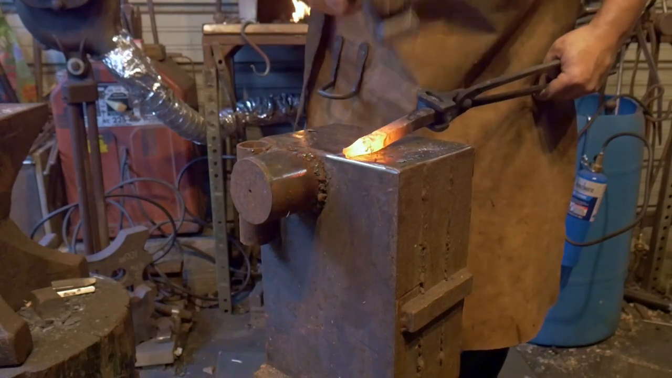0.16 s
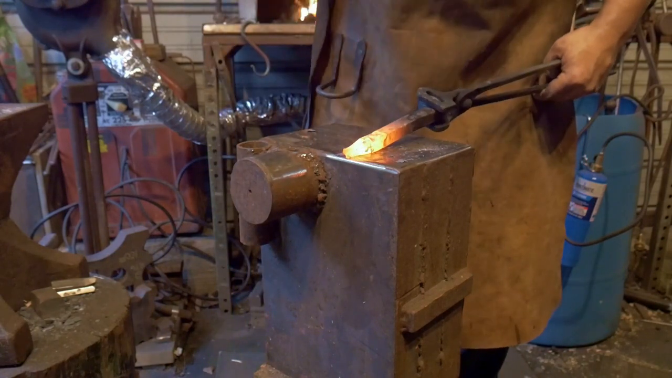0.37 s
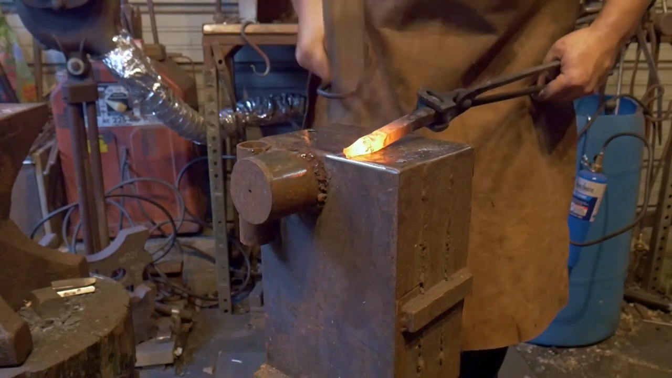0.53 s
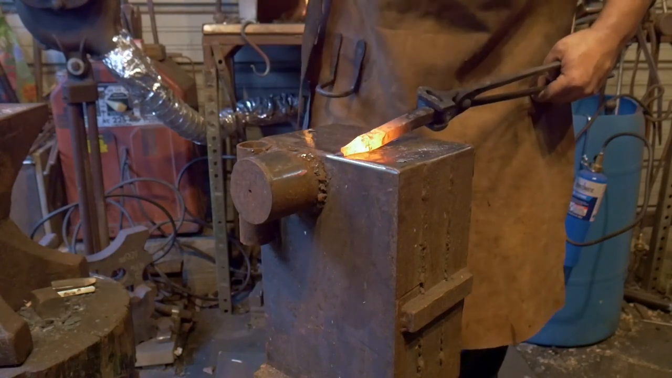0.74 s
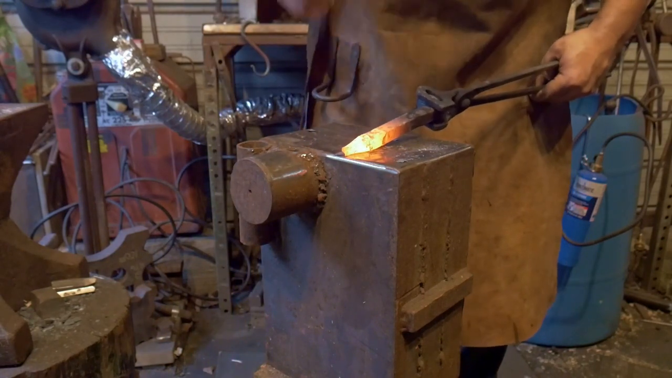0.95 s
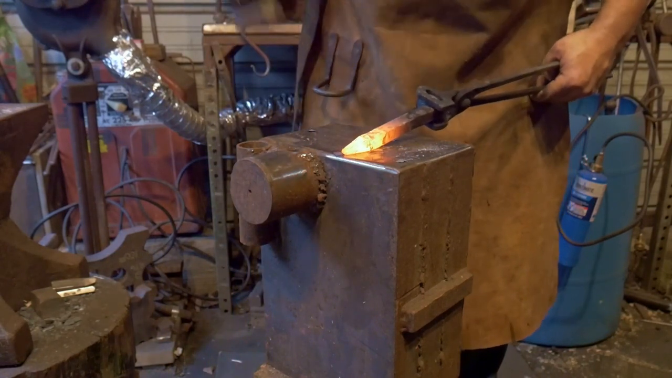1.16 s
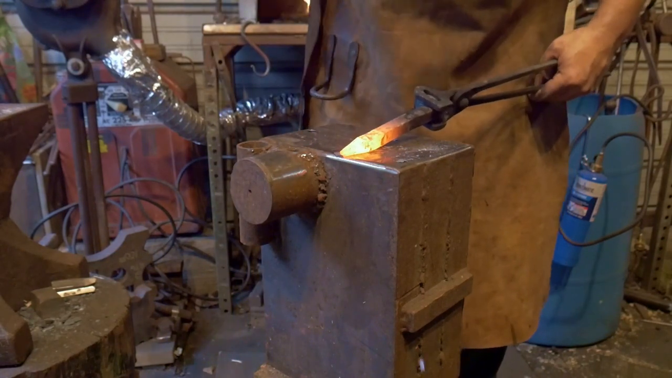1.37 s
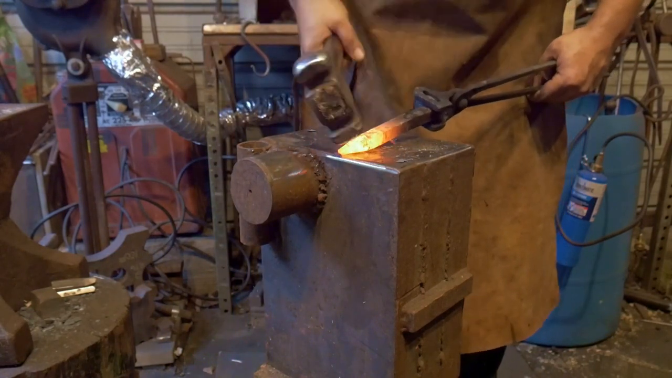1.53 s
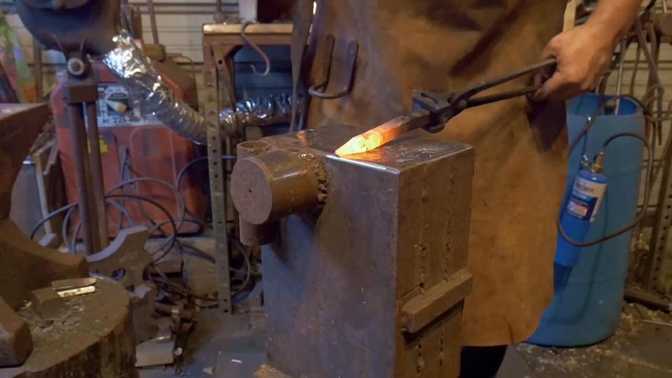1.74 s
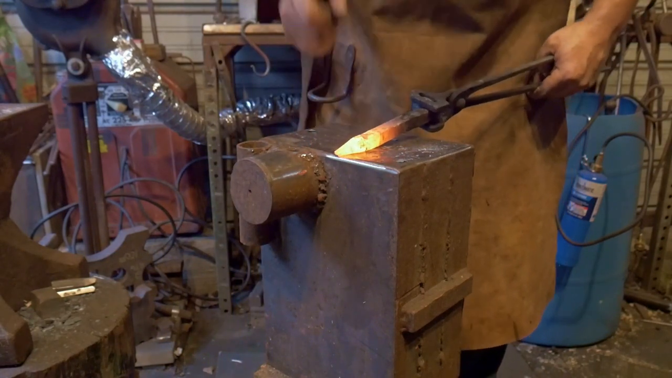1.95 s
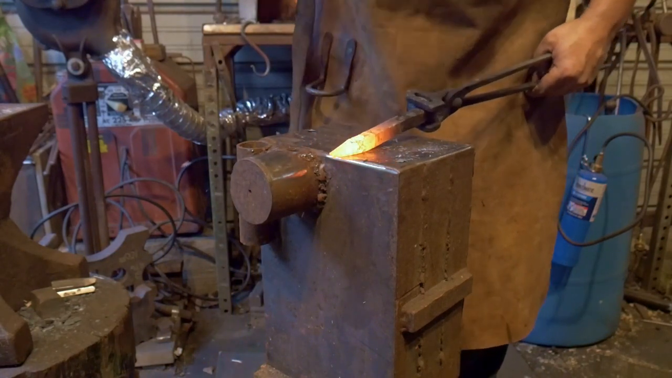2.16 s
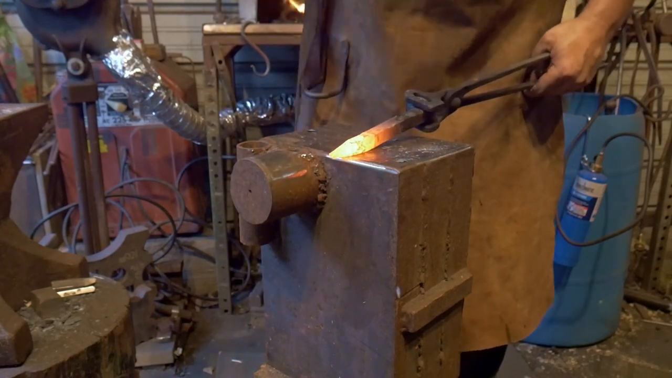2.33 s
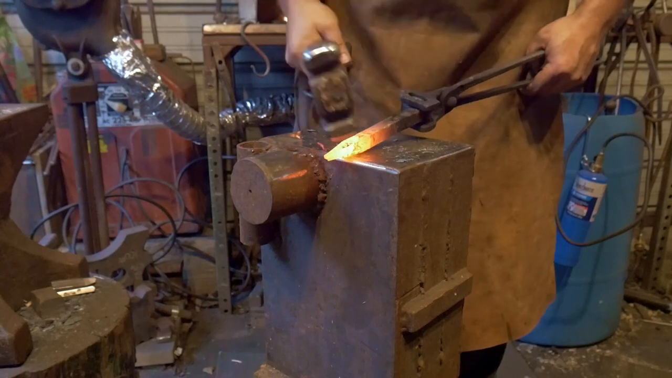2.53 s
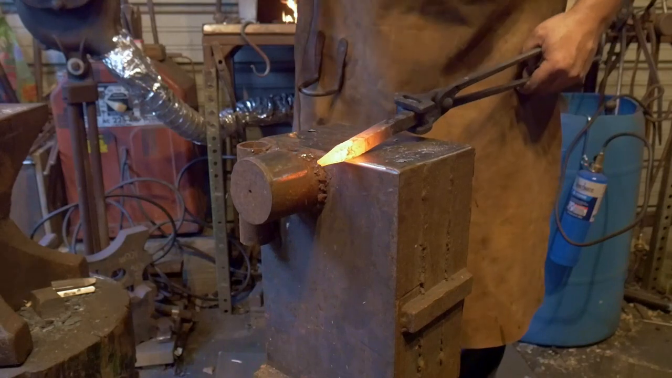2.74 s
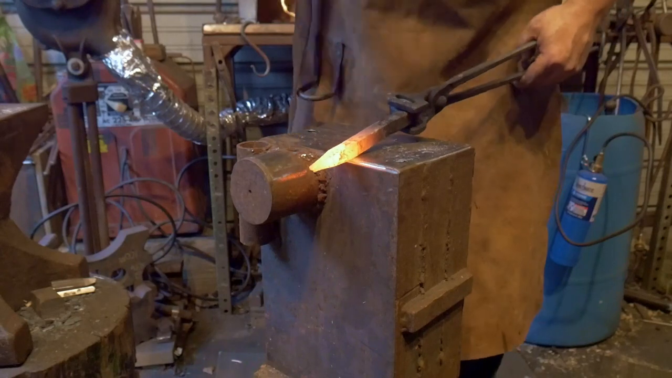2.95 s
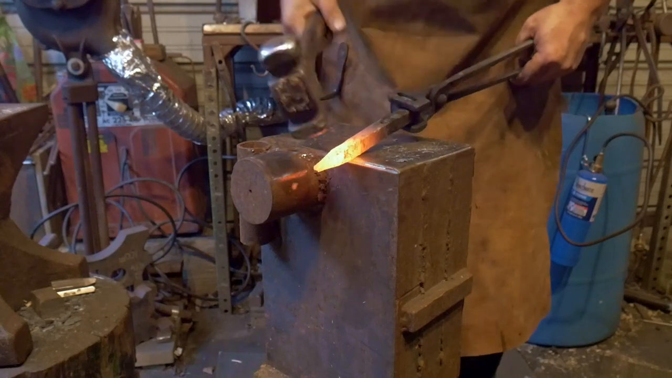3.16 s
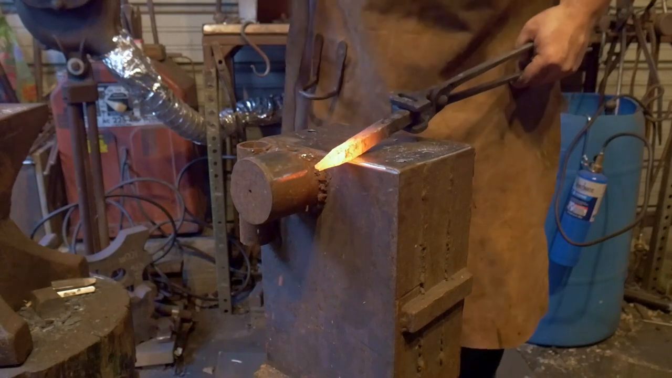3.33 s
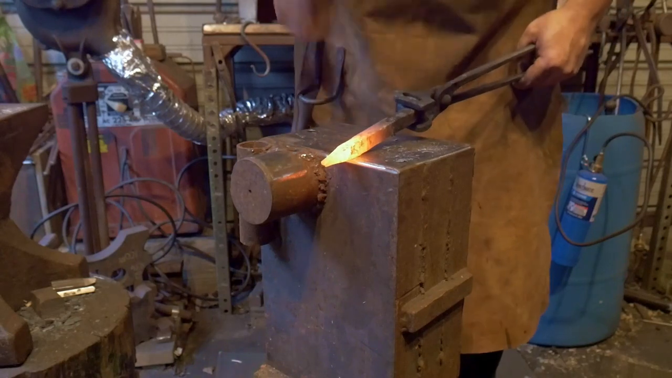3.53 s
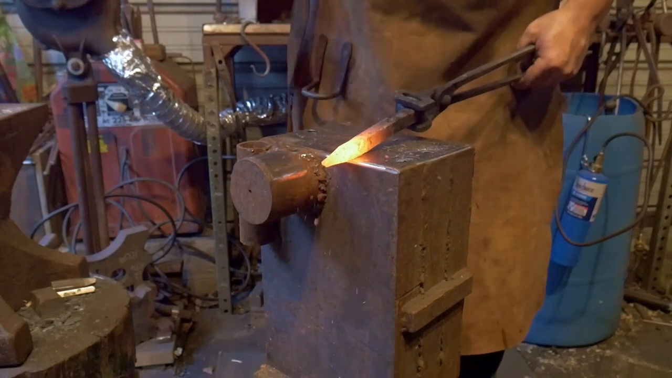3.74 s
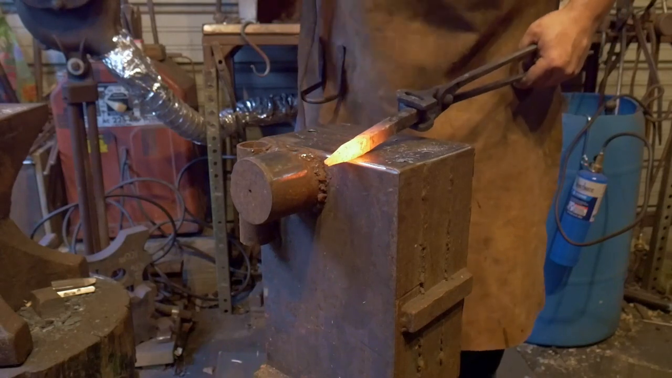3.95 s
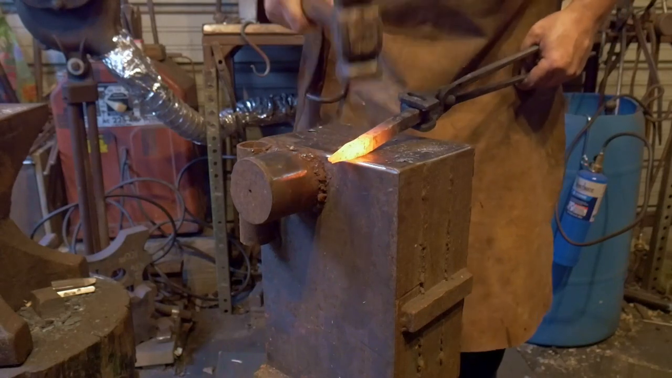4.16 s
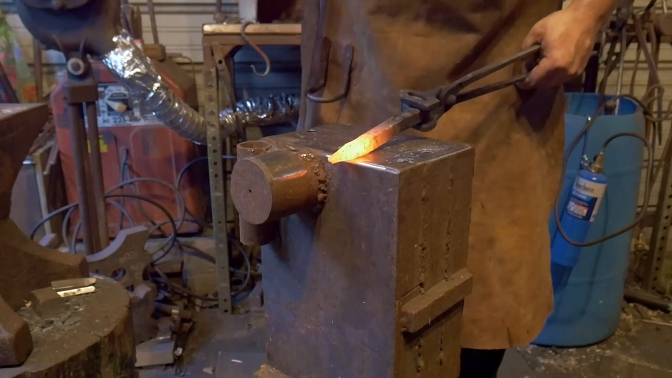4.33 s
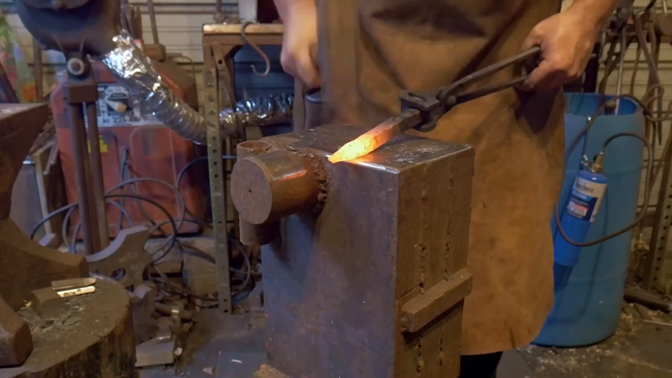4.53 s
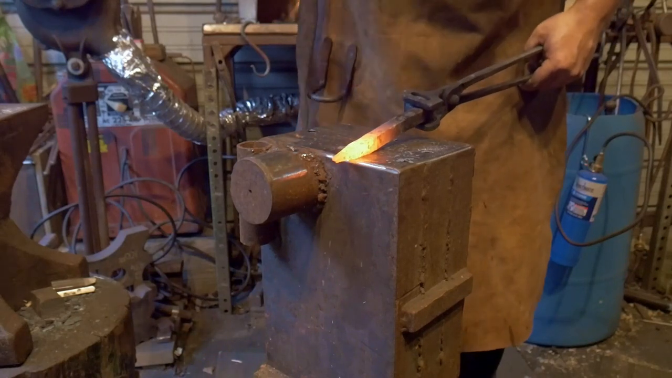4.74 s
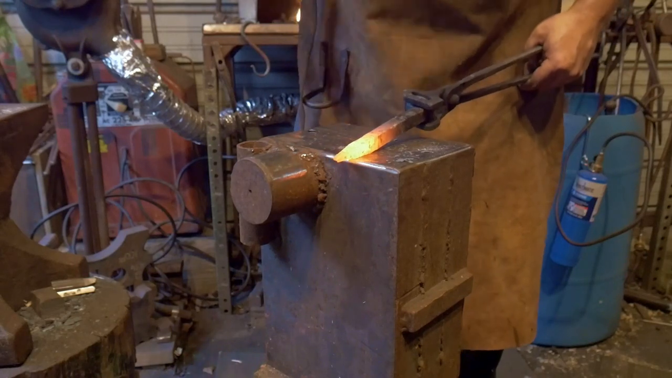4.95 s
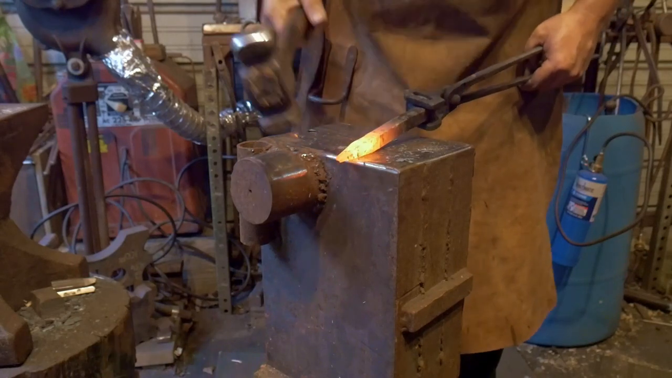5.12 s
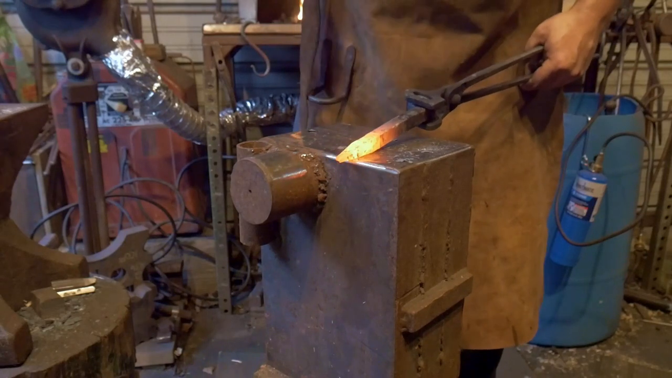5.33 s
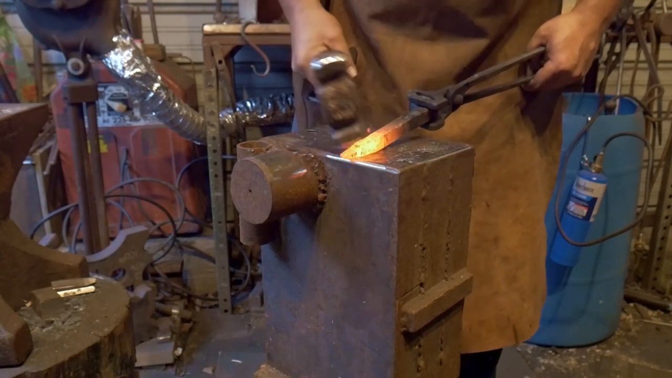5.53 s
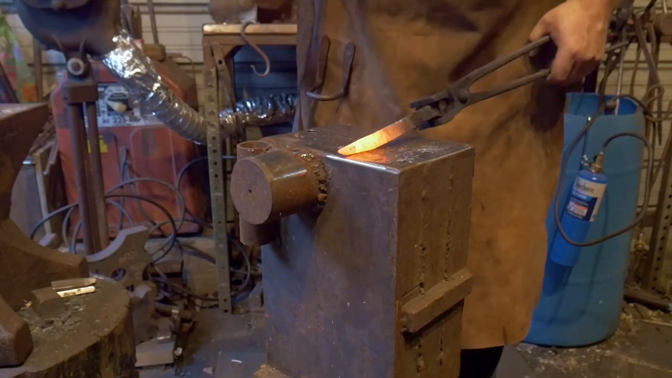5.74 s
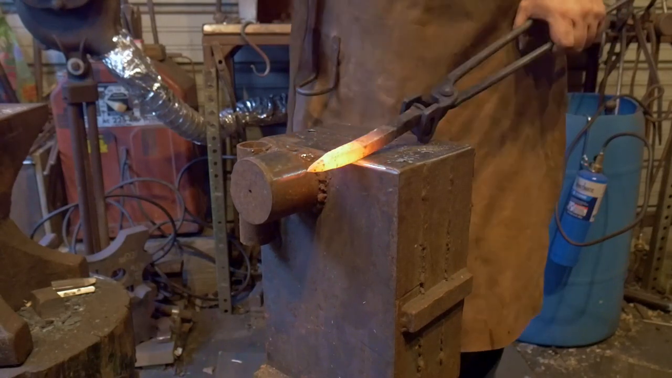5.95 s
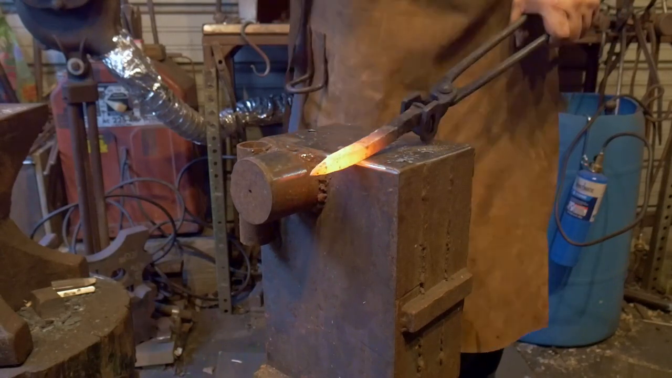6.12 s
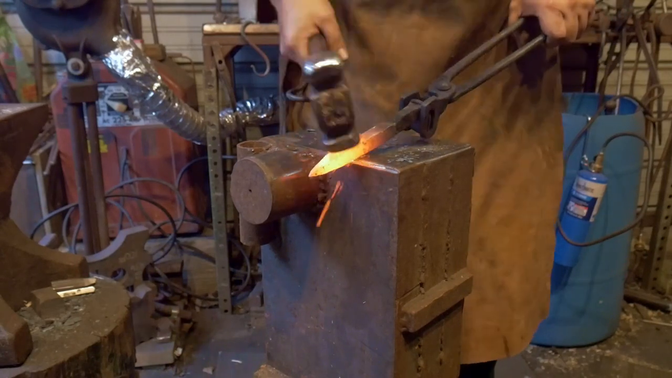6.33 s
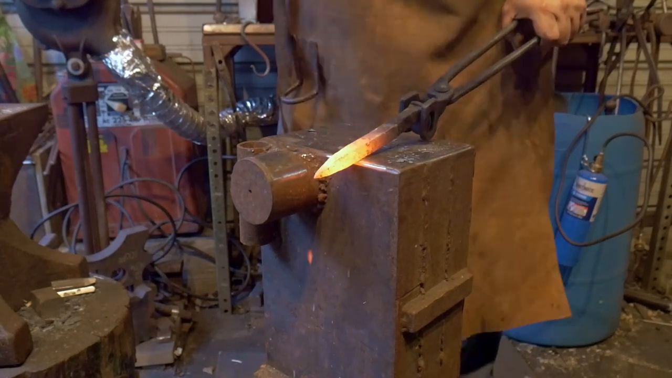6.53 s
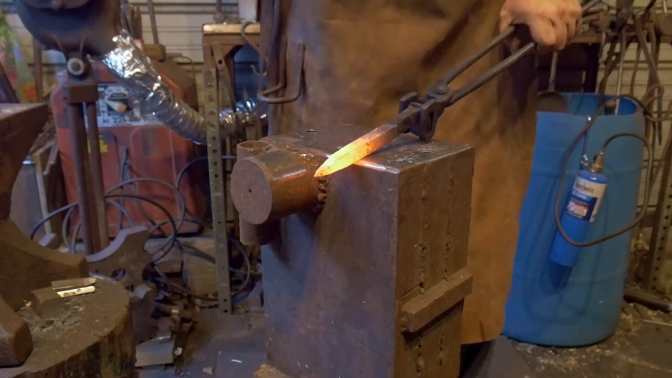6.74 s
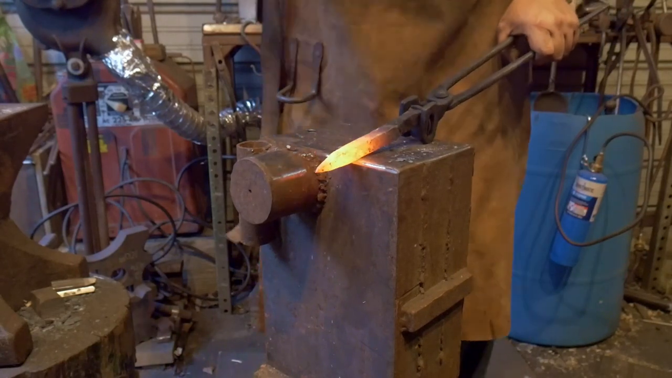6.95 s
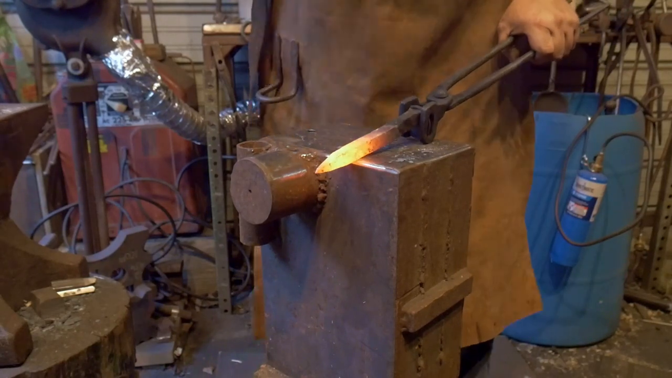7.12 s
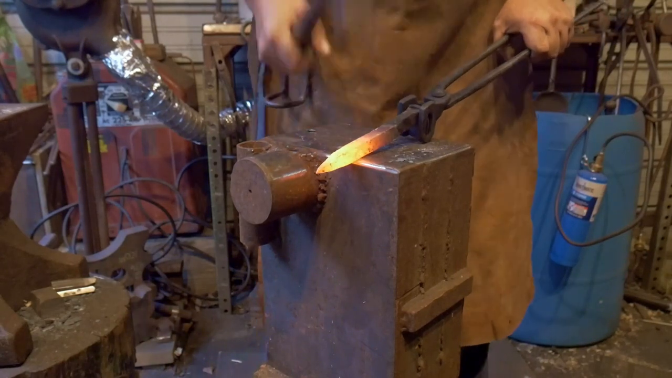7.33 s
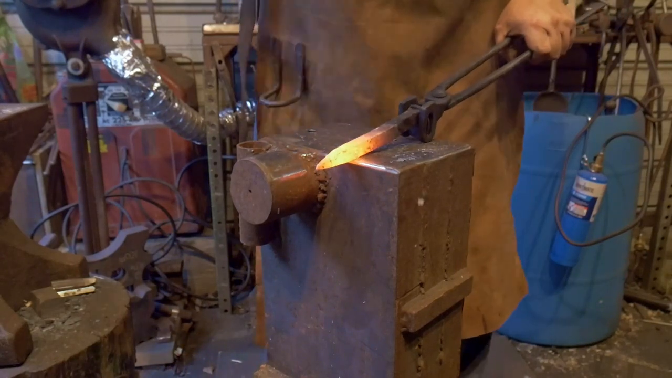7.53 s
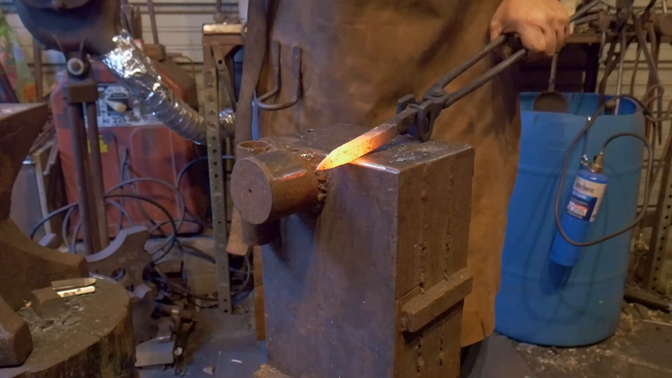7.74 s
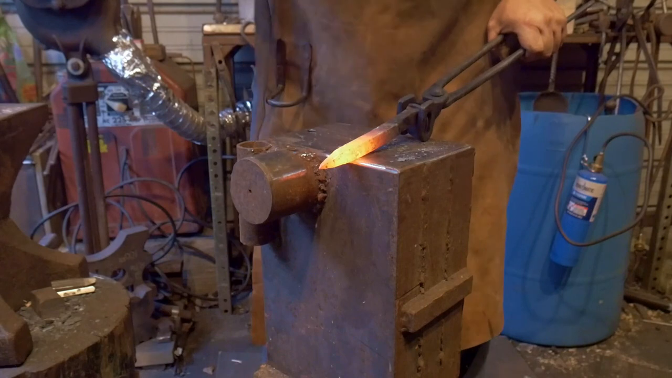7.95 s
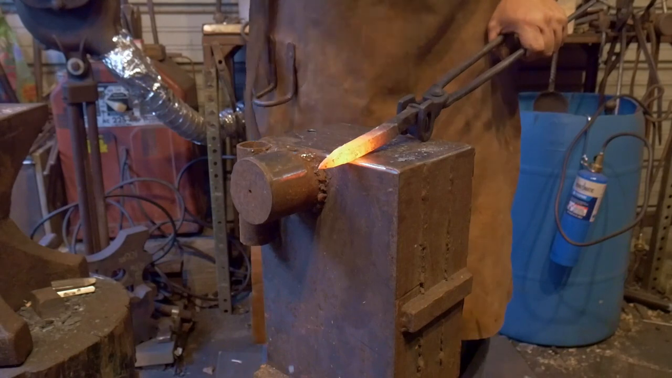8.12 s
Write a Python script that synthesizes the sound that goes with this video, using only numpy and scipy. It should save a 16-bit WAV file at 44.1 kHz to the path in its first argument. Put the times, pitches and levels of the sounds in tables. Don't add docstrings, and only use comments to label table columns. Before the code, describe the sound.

A hand hammer strikes hot steel on a block anvil in steady blows, dull thud and bright crack with a short metallic ring, workshop echoing.

```python
import sys
import numpy as np
from scipy import signal
from scipy.fft import rfft, irfft
from scipy.io import wavfile
from scipy.ndimage import uniform_filter1d

SR = 44100
rng = np.random.default_rng(int(sys.argv[2]) if len(sys.argv) > 2 else 0)


def makeup_ratio(level_db):
    decades = np.asarray(level_db, float) / 20
    return 10 ** decades


def generate_wav(sig):
    pcm = np.round(np.clip(np.atleast_2d(sig).T, -1, 1) * 32767).astype(np.int16)
    wavfile.write(sys.argv[1], SR, pcm)


N = 360738

# start_s, thud_db, knock_db, crack_db, edge_db
BLOWS = [(0.1323, 3.5, -2.5, -3.5, -14.5), (0.6219, 1.5, -0.5, -4.5, -17), (1.0978, -0.5, -5, -4.5, -19),
         (1.5907, 2.5, 1.5, -1, -10), (2.0708, 0.5, 0, -1, -13.5), (2.5913, -1, 1, -2.5, -10.5),
         (3.1647, 1.5, -3, -2.5, -15.5), (3.6663, 2, 0.5, 0, -8.5), (4.1375, -0.5, -1, 1.5, -7.5),
         (4.6224, 0, 0, 0, -10.5), (5.1184, 2.5, -3, -3.5, -12), (5.6091, -1, -0.5, -2, -12),
         (6.3865, -2.5, -5, 1.5, -12), (6.9087, 0.5, -2, 1, -8.5), (7.416, -0.5, -2, 3, -10.5),
         (7.9121, 1, -4.5, 4, -13.5)]
# across_face (-1..1), along_block (-1..1), face_pitch_hz, bar_pitch_hz
LANDINGS = [(0.11, 0.96, 9860, 3000), (-.52, -0.079, 9760, 3035), (-.72, -0.26, 15000, 2955),
            (-0.39, 0.066, 11000, 1900), (0.26, .35, 6030, 2600), (.52, .06, 9700, 1700),
            (-.83, 0.41, 5420, 3540), (.44, -0.23, 9960, 3080), (0.72, 0.64, 9560, 4100),
            (0.46, -.59, 11000, 2600), (-0.34, 0.95, 5960, 3030), (0.42, 0.97, 11000, 4504),
            (.99, 0.73, 7580, 1600), (-.31, 0.3, 9750, 8100), (-0.73, -0.27, 9860, 4300),
            (0.38, -0.29, 14000, 2610)]


def evened(x):
    return x / np.sqrt(np.mean(x ** 2) + 1e-20)


def read(points, hz):
    f, value = np.transpose(points)
    return np.interp(np.log(hz + 1), np.log(f + 1), value)


def coloured(x, points):
    gain = makeup_ratio(read(points, np.fft.rfftfreq(x.shape[-1], 1 / SR)))
    return irfft(rfft(x) * gain, x.shape[-1])


def add(mix, start_s, sound):
    part = mix[..., round(start_s * SR):][..., :sound.shape[-1]]
    part += sound[..., :part.shape[-1]]


def ring(modes, t, spread_db=0, detune=0, phase=0):
    hz, db, t60_s = np.transpose(modes)[..., None]
    chance = rng.standard_normal((3, len(hz), 1))
    turns = hz * (1 + detune * chance[1]) * t + phase * chance[2]
    level = makeup_ratio(db + spread_db * chance[0] - 60 * t / t60_s)
    return (level * np.sin(2 * np.pi * turns)).sum(0)


def forge():
    # hz, db_per_hz
    roar = [(15, -71), (25, -62), (69, -12.5), (221, -8.5), (267, -11.5), (322, -10.5), (666, -9),
            (1050, -12), (1380, -13), (1750, -15.5), (5880, -25.5), (6550, -25.5), (15500, -45.5)]
    # hz, likeness (0..1)
    likeness = [(60, 0.91), (150, 0.79), (380, 0.79), (950, 0.6), (2380, 1), (5980, 0.73), (15000, 0.47)]
    # pitch_hz, level_db, width_hz
    blower = [(165, -66, 14), (1474, -66.5, 8)]
    # time_s, level_db
    flame = [
        (0.0, -56),
        (1.57, -52.5),
        (2.21, -56),
        (4.65, -52.5),
        (4.76, -56.5),
        (6.04, -55.5),
        (6.35, -51),
        (7.36, -54),
        (8.18, -50),
    ]
    roar_db, flame_mean_db = -50.5, -63

    hop = 256
    frames, hz = N // hop + 5, np.fft.rfftfreq(1024, 1 / SR)
    a, b, c, d, patches = rng.standard_normal((frames, 513, 5)).T
    patches = evened(uniform_filter1d(uniform_filter1d(patches, 10, 0), 8, 1))

    flame_db = np.interp(np.arange(frames) * hop / SR, *np.transpose(flame)) - flame_mean_db
    flicker_db = 1.4 * evened(uniform_filter1d(rng.standard_normal(frames), 5))
    lumps_db = (flame_db + flicker_db) / (1 + (hz[:, None] / 600) ** 2)

    same = np.clip(read(likeness, hz), -1, 1)[:, None]
    left = a + 1j * b
    right = same * left + np.sqrt(1 - same ** 2) * (c + 1j * d)
    z = np.array([left, right]) * makeup_ratio(read(roar, hz)[:, None] + patches + lumps_db)
    out = makeup_ratio(roar_db) * evened(signal.istft(z, nperseg=1024, noverlap=768)[1][:, :N])

    for line_hz, db, width_hz in blower:
        pole = np.exp(2j * np.pi * line_hz / SR - np.pi * width_hz / SR)
        line = signal.lfilter([1], [1, -pole], rng.standard_normal(N)).real
        out += makeup_ratio(db) * evened(line)
    return out


def anvil():
    # pitch_hz, level_db, t60_s
    leftover = [(5749, -63, .85)]
    # pitch_hz, level_db, t60_s
    rings = [(2864, -32, .65), (5749, -32, .85), (5808, -25, .38), (7054, -33, .55), (7496, -34, .58),
             (10075, -45, .45), (11445, -50, .4), (11880, -53, .7)]
    # base_db, db_per_knock_db, db_across_face, db_along_block
    waking = [(-2.4, 2, 2, 0), (-10, 0.1, 0.5, 2.2), (-3.5, 1.9, 4, 5), (-4, .6, 8.5, -4),
              (-2.5, -0.4, 2, -11.5), (1.5, -1, -2, -1.5), (-2, -2, 6.5, 0), (-2.5, 5.1, 2, -3)]
    # pitch_hz, level_db, t60_s
    tongs = [(2785, -46, .4), (2948, -44, .35), (2995, -46, .35), (6210, -45, .45), (8190, -50, .5),
             (9620, -50, .35), (4250, -46, .3), (11040, -54, .35), (11630, -56, .4), (12410, -60, .5),
             (13730, -64, .4)]
    # pitch_hz, level_db, t60_s
    low_rings = [(1098, -40, .5), (1147, -34, .5), (1189, -35, .55), (1229, -30, .55), (1507, -42, .35)]

    out, t = np.zeros(N), np.arange(40000) / SR
    add(out, 0, ring(leftover, t))
    for (start_s, thud_db, knock_db, *_), (across, along, *_) in zip(BLOWS, LANDINGS):
        wake_db = np.array(waking) @ [1, knock_db, across, along]
        woken = [(hz, db + more_db, t60_s) for (hz, db, t60_s), more_db in zip(rings, wake_db)]
        long = ring(woken, t, phase=1)
        long += ring(tongs, t, spread_db=3, detune=.001, phase=1)
        long += makeup_ratio(thud_db) * ring(low_rings, t, spread_db=1.5, detune=.001, phase=.05)
        add(out, start_s, long * (1 - np.exp(-t / 0.0025)))
    waver = makeup_ratio(0.87 * evened(uniform_filter1d(rng.standard_normal(N), 600)))
    return waver * (out + .3 * np.roll(out, 60) * np.array([[1], [-1]]))


def swing():
    # hz, db_per_hz
    swish = [(500, -7.5), (1500, -3.5), (3500, -6), (7000, -16.5), (11000, -23), (15000, -28)]
    swish_db, rise_s, beat_s = -52, .06, .58

    t, level = np.arange(N) / SR, np.zeros(N)
    pauses_s = np.diff(np.transpose(BLOWS)[0], prepend=-beat_s)
    for (start_s, _, knock_db, crack_db, _), pause_s in zip(BLOWS, pauses_s):
        speed_db = 0.99 * (knock_db + crack_db)
        blow_rise_s = rise_s / makeup_ratio(0.27 * speed_db) + .7 * max(pause_s - beat_s, 0)
        approach = np.clip(1 + (t - start_s) / blow_rise_s, 0, 1) ** 0.28
        level += makeup_ratio(swish_db + speed_db) * approach * (t < start_s)
    air = rng.standard_normal((3, N))
    rustle = makeup_ratio(0.84 * evened(uniform_filter1d(rng.standard_normal(N), 300)))
    return level * rustle * evened(coloured(air[0] + 0.58 * air[1:], swish))


def boom_of(thud_db, edge_db):
    return -0.73 * thud_db - 0.69 * edge_db


def hammer():
    # pitch_hz, level_db, t60_s
    boom = [(335, -34, 0.0091), (480, -18.5, 0.015)]
    thud = [(675, -18, 0.054), (1116, -11.5, 0.023), (1237, -12.5, 0.0051), (1393, 6.5, 0.0026)]
    knock = [(2220, -10.5, 0.012), (2895, 1, 0.0066), (3756, -3.5, 0.0054), (4120, -0.5, 0.0063)]
    crack = [(5930, -8.5, 0.017), (6446, -5, 0.011), (7490, -8.5, 0.015), (8930, -7.5, 0.013),
             (9720, -0.5, .011), (10700, -1, 0.0043)]
    edge = [(11900, -10, .005), (13800, -12, .004), (14900, -18, .003)]
    # hz, level_db
    oxide = [(1200, -30.5), (2500, -3.5), (6000, 1), (10500, 2), (13000, -6), (15000, -21.5), (15700, -42)]
    face_db, face_t60_s = -0.5, .015
    bar_db, bar_t60_s = -3.1, 0.0082
    oxide_db, oxide_t60_s = -3.5, 0.027

    out, t = np.zeros(N), np.arange(4000) / SR
    for (start_s, thud_db, knock_db, crack_db, edge_db), (*_, face_hz, bar_hz) in zip(BLOWS, LANDINGS):
        blow = makeup_ratio(thud_db) * ring(thud, t, spread_db=0.27, detune=0.0046, phase=0.041)
        blow += makeup_ratio(boom_of(thud_db, edge_db)) * ring(boom, t)
        bar_level_db = bar_db + knock_db + 0.51 * crack_db
        blow += makeup_ratio(bar_level_db) * ring([(bar_hz, 0, bar_t60_s)], t, phase=0.15)

        bright = makeup_ratio(knock_db) * ring(knock, t, spread_db=1.5, detune=.02, phase=.2)
        crack_modes = crack + [(face_hz, face_db, face_t60_s)]
        bright += makeup_ratio(crack_db) * ring(crack_modes, t, spread_db=1.5, detune=.012, phase=.4)
        bright += makeup_ratio(edge_db) * ring(edge, t, spread_db=1.5, detune=0.015, phase=1.0)
        shatter = coloured(rng.standard_normal(len(t)), oxide)
        bright += makeup_ratio(crack_db + oxide_db - 60 * t / oxide_t60_s) * shatter

        add(out, start_s, blow * (1 - np.exp(-t / .0002)))
        add(out, start_s, bright * (1 - np.exp(-t / .0004)))
    return signal.sosfilt(signal.butter(4, 230, "high", fs=SR, output="sos"), out)


def reflections():
    # delay_s, level_db, left_right_db, signed_gain
    echoes = [(.0013, -0.5, 4, 1.36), (.0024, -13, 2.5, 4), (.0040, -16, -4.5, 2.8), (.0072, -8, -7, 0.97),
              (.0098, -14, 6.5, 1.7), (0.0123, -12.5, 4.5, -1.5), (0.0149, -17, -9.5, -7),
              (0.0129, -18.5, -1, 2.4), (0.0177, -11, -1.5, -1)]
    # hz, level_db
    echo_colour = [(200, -12), (1200, -3), (3000, -10), (8000, -18), (15000, -34.5)]
    # hz, level_db
    flutter_colour = [(600, -31), (1000, -14), (1190, -11.5), (1350, -11), (2300, -33.5), (8000, -35)]
    # delay_s, level_db, channel
    body = [
        (.00007, -15, 0),
        (.00005, -11, 1),
        (.00025, -16.5, 0),
        (0.00054, -29.5, 1),
    ]
    flutter_s, period_s, flutter_db, loss_db = .0385, .0232, -8.5, 3.3

    early, flutter = np.zeros((2, 2, SR))
    for delay_s, db, pan_db, gain in echoes:
        early[:, round(delay_s * SR)] = gain * makeup_ratio(db + np.array([.5, -.5]) * pan_db)
    for k in range(14):
        bounce_s = flutter_s + k * period_s + rng.uniform(-.002, .002) + rng.uniform(0, .0001, 2)
        flutter[[0, 1], np.round(bounce_s * SR).astype(int)] = makeup_ratio(flutter_db - k * loss_db)
    response = coloured(early, echo_colour) + coloured(flutter, flutter_colour)
    response[:, 0] += 1
    for delay_s, db, channel in body:
        response[int(channel), round(delay_s * SR) + np.arange(2)] += makeup_ratio(db) * np.array([1, -1])
    return response


def tail():
    # hz, t60_s
    shop_t60 = [(150, 0.23), (500, 0.34), (1300, 0.48), (3500, 0.48), (8000, 0.43), (14000, 0.35)]
    likeness, build_s, spacing = 0.76, 0.0009, 12

    taps = np.zeros((2, SR))
    slots = np.arange(150, SR - spacing, spacing)
    at = slots + rng.integers(0, spacing, (2, len(slots)))
    np.put_along_axis(taps, at, rng.choice([-1., 1.], at.shape), 1)
    apart = np.arccos(likeness) / 2
    taps = np.cos(apart) * taps[0] + np.sin(apart) * taps[1] * np.array([[1], [-1]])

    hz, t, z = signal.stft(taps, SR, nperseg=256)
    decay = makeup_ratio(-60 * t / read(shop_t60, hz)[:, None])
    taps = signal.istft(z * decay, SR, nperseg=256)[1][:, :SR]
    taps *= 1 - np.exp(-np.arange(SR) / SR / build_s)
    return taps / np.linalg.norm(taps[0])


def shop():
    # hz, level_db
    spread = [(60, -15), (180, -6), (400, 0.5), (800, 6), (1250, 8.5), (2000, 2.5), (2900, 5), (4500, 0.5),
              (6500, 4), (9500, 2.5), (11500, 4.5), (14900, -5), (15400, -28)]
    part_hz = [320, 1000, 3300, 8000, 13000]
    # pitch_hz, width_hz, level_db
    block = [(1190, 70, 3), (2880, 90, 4), (5800, 100, 2.5)]
    shop_db, ripple_db = 12.5, 2
    lead = 100

    clicks, hz = np.zeros((2, N)), np.fft.rfftfreq(1024, 1 / SR)
    shifts = rng.uniform(-0.8, 1, len(BLOWS))
    for (start_s, *parts_db), (*_, face_hz, bar_hz), shift in zip(BLOWS, LANDINGS, shifts):
        peaks = block + [(face_hz, 400, 5), (bar_hz, 300, 4)]
        peaks_db = sum(db * np.exp(-((hz - middle) / width) ** 2) for middle, width, db in peaks)
        peaks_db += ripple_db * evened(uniform_filter1d(rng.standard_normal(len(hz)), size=5))
        boom_db = boom_of(parts_db[0], parts_db[-1])
        blow_db = read(list(zip(part_hz, [boom_db, *parts_db])), hz)
        colour = makeup_ratio(shop_db + read(spread, hz) + blow_db + peaks_db)

        log_gain = np.log(np.r_[colour, colour[-2:0:-1]])
        causal = colour * np.exp(-1j * signal.hilbert(log_gain).imag[:len(hz)])
        trade = shift * hz / 1500
        click = irfft(causal * np.array([np.cos(trade), np.sin(trade)]))
        add(clicks, start_s - lead / SR, np.roll(click, lead, axis=1))
    return sum(signal.fftconvolve(track[None], tail(), axes=1)[:, :N] for track in clicks)


def stand():
    # pitch_hz, level_db, t60_s
    shake = [(326.7, -27, .025), (120, -51.5, .06)]
    out, t = np.zeros(N), np.arange(4000) / SR
    for start_s, thud_db, *_ in BLOWS:
        add(out, start_s + .002, makeup_ratio(thud_db) * ring(shake, t, spread_db=3))
    return out * np.array([[1], [-.8]])


def scene():
    struck = signal.fftconvolve(hammer()[None], reflections(), axes=1)[:, :N]
    return struck + anvil() + shop() + stand() + swing() + forge()


def top_cut(x):
    return signal.sosfilt(signal.butter(12, 16590, fs=SR, output="sos"), x)


def record(dry):
    clip, notch_hz, notch_width_hz, top_hz = .9, 7860, 150, 16500
    threshold_db, attack_s, regain_db_per_s = -25, 0.0015, 176.0

    power_db = 10 * np.log10(signal.lfilter([.02], [1, -.98], (dry ** 2).mean(0)) + 1e-12)
    fall_db = np.arange(N) * regain_db_per_s / SR
    peak_db = np.maximum.accumulate(power_db + fall_db) - fall_db
    over_db = np.maximum(peak_db - threshold_db, 0)
    lag = np.exp(-1 / (attack_s * SR))
    held = dry / makeup_ratio(0.28 * signal.lfilter([1 - lag], [1, -lag], over_db))

    clipped = np.clip(held, -clip, clip)
    notched = signal.lfilter(*signal.iirnotch(notch_hz, notch_hz / notch_width_hz, SR), clipped)
    low_cut = signal.sosfilt(signal.butter(2, 70, "high", fs=SR, output="sos"), notched)
    band_limit = signal.firwin(255, top_hz, window=("kaiser", 8), fs=SR)
    limited = signal.oaconvolve(low_cut, band_limit[None], "same")
    return top_cut(limited)


dry = scene()
out = record(dry)
generate_wav(out)
```